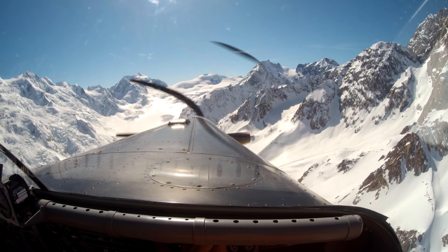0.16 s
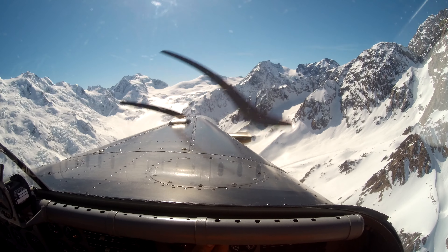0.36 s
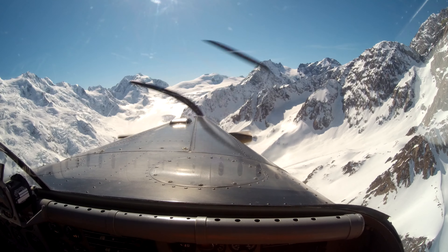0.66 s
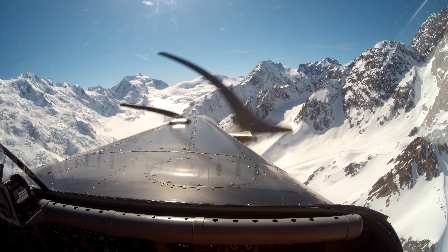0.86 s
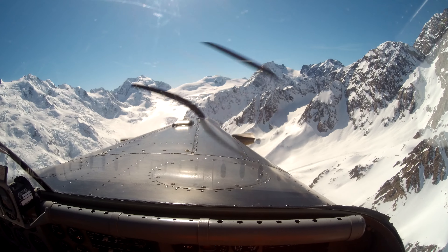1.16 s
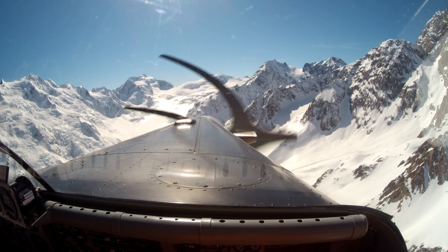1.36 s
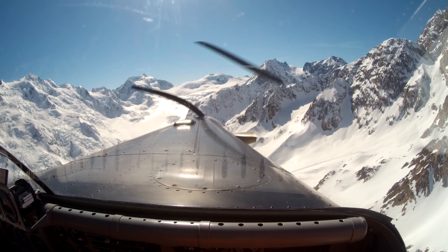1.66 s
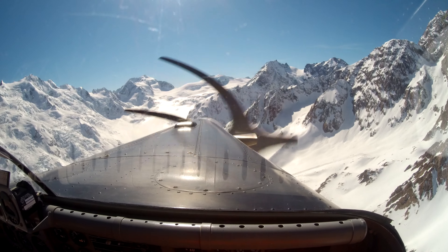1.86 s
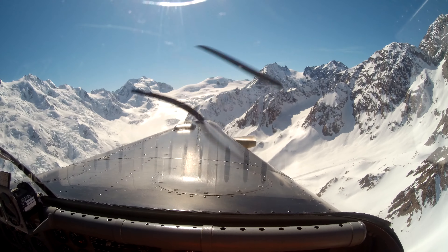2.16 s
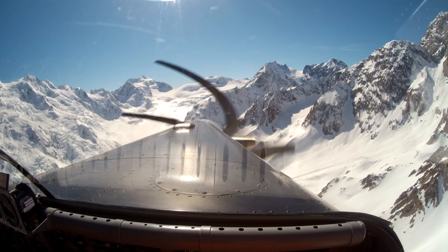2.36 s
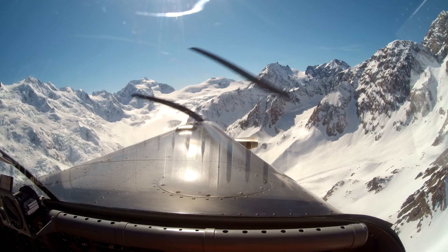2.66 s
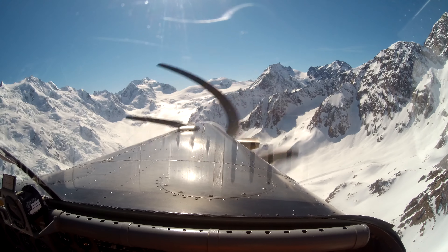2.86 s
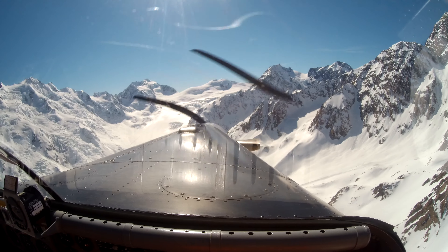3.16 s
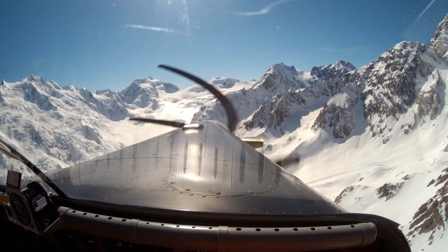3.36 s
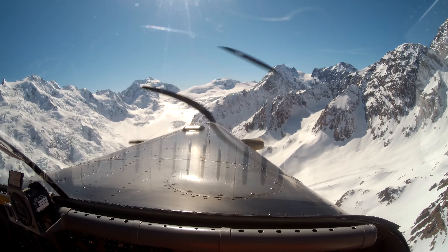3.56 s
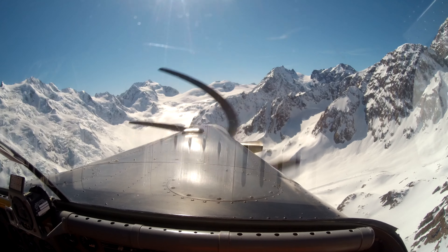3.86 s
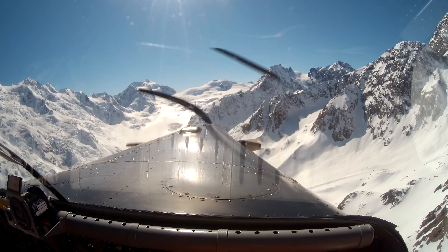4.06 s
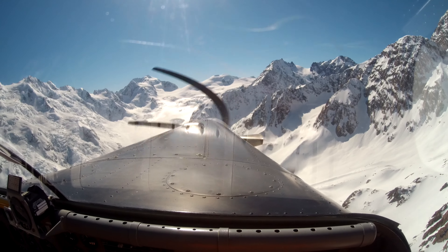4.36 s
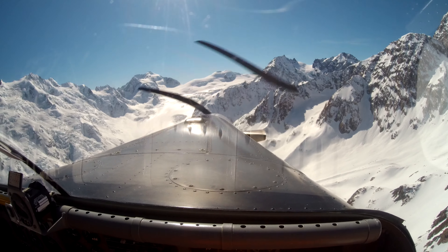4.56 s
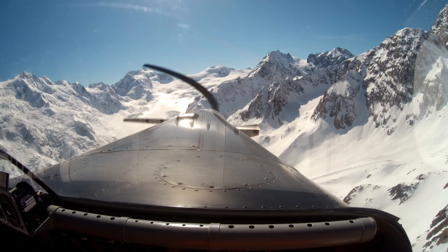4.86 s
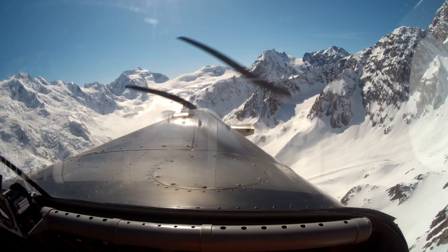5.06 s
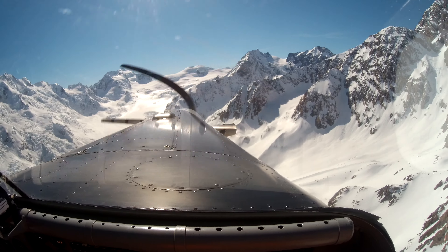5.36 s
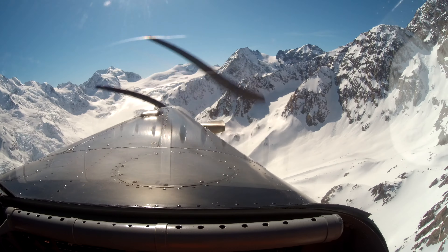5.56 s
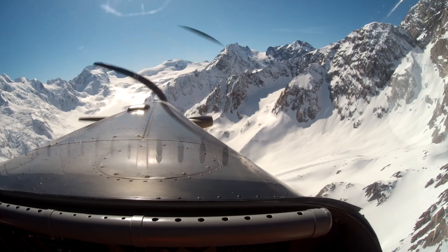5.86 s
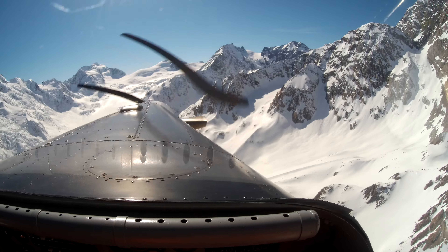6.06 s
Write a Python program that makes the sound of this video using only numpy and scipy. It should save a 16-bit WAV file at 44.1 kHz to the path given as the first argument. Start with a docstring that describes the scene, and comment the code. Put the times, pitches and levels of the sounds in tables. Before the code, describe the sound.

A small turboprop plane drones in steady flight for about six seconds, heard inside the cockpit from a microphone behind the windscreen. The loudest sound is the propeller: a deep, buzzing hum that keeps the same pitch throughout and throbs slightly and irregularly. Around it, air roars dully against the cabin walls and hisses softly along the glass. Thin, faint turbine whines and a very high whistle sit on top. At about 1.5 seconds a nasal overtone briefly stands out in the drone. From roughly 2.5 to 5.5 seconds, a series of short, mild gusts lifts the rush of air. The hiss grows a little brighter around 5 seconds, and a high gear whine comes forward slightly at about 5.5 seconds. The treble has a fine, rough flutter all along, as the pressure strains the microphone. The drone continues to the end.

```python
"""A three-blade propeller drones, heard from the cockpit of a single turboprop cruising over mountains.
Each passing blade sends a pressure pulse into the cabin, the slipstream roars on the walls and hisses
along the glass, and turbine and gearbox whine thinly above it. The microphone is a camera's, behind
the windscreen; the pressure swings choke its treble for a millisecond or two at a time."""
import sys
import numpy as np
from scipy import signal
from scipy.fft import rfft, irfft, next_fast_len
from scipy.io import wavfile

SR = 44100
rng = np.random.default_rng(int(sys.argv[2]) if len(sys.argv) > 2 else 0)


def file_out(sig):
    """Save sig as 16-bit WAV at sys.argv[1]."""
    # one column per channel
    cols = np.atleast_2d(sig).T
    # limit, then scale
    lim = np.clip(cols, -1, 1)
    pcm = np.round(lim * 32767).astype(np.int16)
    wavfile.write(sys.argv[1], SR, pcm)


N = 274743
TIME = np.arange(N) / SR
BLADES, WAKE_DELAY_CYCLES = 3, 0.29  # the wake trails each blade by this share of a blade pass


def propeller(turns, gust, throb_db=1.53, throb_hz=8.3, smear_cycles=0.022):
    """Each blade sends in a suction pulse, then its wake's slap; unequal blades add shaft-rate tones."""
    # drone of the blades: multiple of the blade rate, level/dB at the start, midway, at the end
    blade_tones = [(1, -20.5, -19.5, -20), (2, -20.5, -19.5, -20), (3, -34.5, -30, -29.5),
                   (4, -32.5, -30.5, -30.5), (5, -41.5, -55.5, -42.5), (6, -28.5, -34, -31),
                   (7, -41, -38, -36.5), (8, -48.5, -40, -46.5), (9, -53, -43.5, -53),
                   (10, -45, -49.5, -43.5), (11, -51, -52.5, -53), (12, -51, -49, -53)]
    # weak tones between them: multiple of the shaft rate, level/dB
    shaft_tones = [(5, -50), (8, -46), (10, -37.5), (11, -48.5), (13, -41.5), (16, -56), (17, -46),
                   (19, -47), (23, -46), (25, -52), (31, -58)]
    # chance wavering of the two deepest tones as slipstream noise beats against them:
    # t/s, level/dB added to the second and taken from the first
    chance_waver = [(0, -1.5), (.4, -1), (.7, 1), (1.6, 1), (1.85, 4.5), (2.1, -2), (2.27, 1), (2.9, 3),
                    (3.1, 0), (3.95, 2.5), (4.2, -3.5), (4.42, 3), (4.65, 0.5), (5.0, -1.5), (5.27, 4),
                    (5.7, -2.5), (5.9, 5), (6.23, -2)]
    waver_db, = curves(chance_waver)
    throbs = [undb(-0.77) * swell(throb_db * walk(throb_hz) - waver_db),
              undb(-0.07) * swell(throb_db * walk(throb_hz) + waver_db)]
    passes = BLADES * turns
    drone = 0
    for multiple, *levels_db in blade_tones:
        order, level_db = round(multiple), drift(levels_db)
        if order <= 2:  # the deep suction pulse throbs at random
            drone -= tone(order * passes, level_db, flutter=0.058, flutter_hz=4.9) * throbs[order - 1]
        else:  # the slap comes later and swells with the gusts
            smear = smear_cycles * (order - 6.8) ** 2  # the walls delay its low overtones most
            cycles = order * (passes - WAKE_DELAY_CYCLES) + smear
            if order == 10:  # one nasal overtone stands out for a moment
                level_db += 10 * bell(crest_s=1.55, fall_s=0.23)
            drone += tone(cycles, level_db - 0.5, flutter=0.035 * order, flutter_hz=5) * gust
    for multiple, level_db in shaft_tones:
        drone += tone(round(multiple) * turns + rng.random(), level_db, flutter=0.44, flutter_hz=4)
    return drone


def slipstream(turns, gust, hiss_gain, boom_hz=340, dull_hz=3480, eddy_db=0.51):
    """Turbulent air beats on the cabin, harder behind every blade, and hisses along the windscreen."""
    # slipstream through the cabin walls: f/Hz, level/dB
    roar_spectrum = [(15, -88), (30, -60), (60, -57.5), (85, -45), (135, -41.5), (165, -46), (190, -43.5),
                     (240, -51.5), (340, -50.5), (620, -56.5), (1000, -63.5), (1500, -66.5), (2100, -76),
                     (4000, -100)]
    # air along the windscreen and its seals: f/Hz, level/dB
    hiss_spectrum = [(1000, -100), (2200, -79), (2800, -74), (3400, -75), (4300, -80), (8000, -80.5),
                     (10500, -80.5), (12500, -81.5), (14000, -83.5), (15500, -93)]
    roar = turbulence(roar_spectrum)
    boom = filtered(roar, lambda f: 1 / (1 + (f / boom_hz) ** 4))
    wake = 1 + 0.12 * np.cos(2 * np.pi * (BLADES * turns - WAKE_DELAY_CYCLES))
    buffeting = (roar - boom) * wake * gust
    eddies = undb(eddy_db * walk(hz=14))
    hiss = turbulence(hiss_spectrum) * undb(1)
    dull = filtered(hiss, lambda f: 1 / (1 + (f / dull_hz) ** 8))
    gusty_hiss = dull * hiss_gain ** 0.68 + (hiss - dull) * hiss_gain  # the dull part swings less
    return boom + eddies * (buffeting + gusty_hiss)


def airflow():
    """Gains of roar and hiss: the steady flow, lifted by each gust in a bell-shaped swell."""
    # steady airflow over the cabin: t/s, roar level/dB, hiss level/dB
    steady_flow = [(0, -27, -39.6), (1.7, -27.6, -39.5), (2.7, -30.5, -41), (4.15, -28, -39),
                   (5.3, -26.5, -35), (5.8, -29, -39), (6.23, -27.5, -38)]
    # gusts that buffet the cabin: t/s at the crest, rise/dB
    gusts = [(.43, 1.8), (1.7, 1.2), (2.45, 2), (2.86, 4), (3.36, 3.5), (3.76, 3), (4.07, 1.4), (4.37, 2.5),
             (4.55, 2), (4.87, 4), (5.15, 2.5), (5.48, 2.5)]
    lift_db = sum(rise_db * bell(crest_s, fall_s=0.068) for crest_s, rise_db in gusts)
    return [swell(level_db + lift_db) for level_db in curves(steady_flow)]


def turbine(flow, shaft_hz=592.2, compressor_blades=16):
    """The shaft whines at multiples of its rate and spins the compressor; both follow the airflow."""
    # turbine whines: multiple of the shaft rate, level/dB at the start, midway, at the end
    whine_tones = [(2, -54, -56.5, -54), (3, -58, -58, -59), (6, -63, -57, -58), (7, -56, -58, -59),
                   (9, -54, -59, -70), (23, -66, -66, -66)]
    turns = shaft_hz * TIME + 0.011 * walk(hz=1.4)
    whine = sum(tone(round(multiple) * turns, drift(levels_db), flutter=0.34, flutter_hz=3)
                for multiple, *levels_db in whine_tones)
    whistle = compressor(compressor_blades * turns, compressor_blades * shaft_hz)
    return whine * flow ** 0.92 + whistle * flow ** 0.82


def compressor(passes, pitch_hz, skirt_width_hz=230, sink_db=3):
    """The blades whistle, and intake turbulence scatters a skirt of noise around their pitch."""
    whistle = tone(passes, db=-1.5, flutter=0.2, flutter_hz=6.5)
    skirt = noise(lambda f: 1 / np.hypot(1, 2 * (f - pitch_hz) / skirt_width_hz))
    waver_db = walk(hz=4)
    sunk = np.clip((TIME - 3.1) / 0.53 + 0.5, 0, 1)  # midway the level sinks a little
    return (whistle + skirt) * undb(-43.5) * swell(waver_db - sink_db * sunk)


def gearbox(turns, teeth=85):
    """The gear on the propeller shaft whines at the rate its teeth mesh."""
    # gearbox whine: t/s, level/dB
    mesh_levels = [(0, -54), (3.8, -52), (4.6, -59), (5.5, -46), (6.23, -48)]
    level_db, = curves(mesh_levels)
    return tone(teeth * turns, level_db - 2, flutter=0.5, flutter_hz=9)


def tone(cycles, db, flutter, flutter_hz):
    """A sine whose strength and phase are shaken by the air it crosses."""
    shaken = 1 + flutter * (walk(flutter_hz) + 1j * walk(flutter_hz))
    return np.sqrt(2) * undb(db) * np.real(shaken * np.exp(2j * np.pi * cycles))


def turbulence(spectrum):
    """Rushing air with a spectrum of (f/Hz, level/dB per Hz) points."""
    hz, db = np.transpose(spectrum)
    white = rng.standard_normal(N) * np.sqrt(SR / 2)
    return filtered(white, lambda f: undb(np.interp(np.log(f), np.log(hz), db)))


def walk(hz):
    """Random wander of spread 1, mostly slower than hz."""
    return noise(lambda f: 1 / np.sqrt(1 + (f / hz) ** 4))


def noise(response):
    """Noise of rms 1 with the given colour."""
    x = filtered(rng.standard_normal(N), response)
    return x / np.std(x)


def filtered(x, response):
    """Filter by a gain given as a function of frequency."""
    size = next_fast_len(N)
    hz = np.arange(size // 2 + 1) * SR / size + 1e-6
    return irfft(rfft(x, size) * response(hz), size)[:N]


def curves(table):
    """The columns of a table of timed rows, sample by sample."""
    times_s, *columns = np.transpose(table)
    return [np.interp(TIME, times_s, column) for column in columns]


def drift(levels_db):
    """A slow change of level through evenly spaced points."""
    return np.interp(TIME, np.linspace(0, TIME[-1], len(levels_db)), levels_db)


def bell(crest_s, fall_s):
    """A smooth rise to 1, down to about a third fall_s after the crest."""
    return np.exp(-((TIME - crest_s) / fall_s) ** 2)


def swell(db):
    """A level curve as a gain of rms 1."""
    return undb(db) / np.sqrt(np.mean(undb(db) ** 2))


def undb(db):
    """Decibels to gain."""
    return 10 ** (np.asarray(db) / 20)


def scene():
    """The cockpit: propeller, slipstream, turbine and gearbox, tied together by shaft and airflow."""
    # propeller shaft speed: t/s, f/Hz
    shaft_speed = [(0, 32.622), (2, 32.598), (4, 32.619), (6.23, 32.636)]
    shaft_hz, = curves(shaft_speed)
    turns = np.cumsum(shaft_hz) / SR
    gust, hiss_gain = airflow()
    drone = undb(0.36) * propeller(turns, gust)
    return (drone + slipstream(turns, gust, hiss_gain) + turbine(hiss_gain) + gearbox(turns))[None]


def microphone_choke(pressure, treble_hz=1350, membrane_hz=80, choked_db=-14, stop=0.6, edge=0.1):
    """When pressure and random shaking push the membrane to its stop, the treble drops for a moment."""
    body = filtered(pressure, lambda f: 1 / (1 + (f / treble_hz) ** 4))
    swing = filtered(body, lambda f: 1 / np.hypot(1, f / membrane_hz))  # deep tones move it furthest
    push = swing / np.std(swing) + walk(hz=610)
    free = 0.5 - 0.5 * np.tanh((push / np.std(push) - stop) / edge)
    treble_gain = free + (1 - free) * undb(choked_db)
    return body + (pressure - body) * treble_gain


def record(dry, ceiling=0.92, low_cut_hz=22, high_cut_hz=15400):
    """The microphone chokes on the swings; the camera rounds the peaks and cuts deepest bass and top."""
    rounded = ceiling * np.tanh(microphone_choke(dry[0]) / ceiling) * undb(0.5)
    trimmed = filtered(rounded, lambda f: 1 / np.hypot(1, (low_cut_hz / f) ** 3))
    high_cut = signal.ellip(10, 0.2, 80, high_cut_hz, fs=SR, output="sos")
    return signal.sosfilt(high_cut, trimmed)[None]


dry = scene()
out = record(dry)
file_out(out)
```